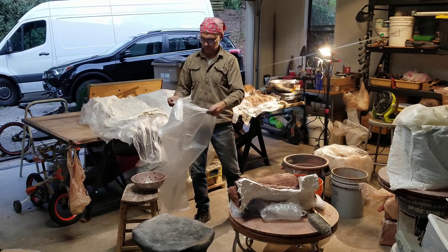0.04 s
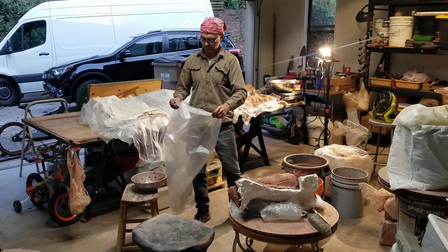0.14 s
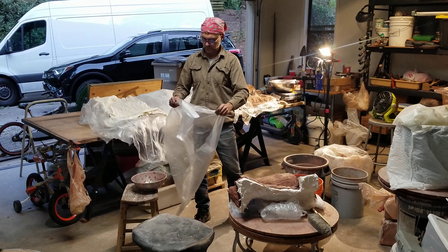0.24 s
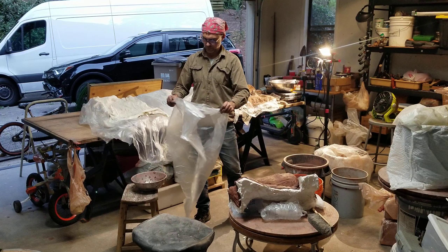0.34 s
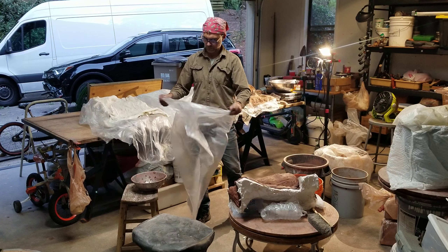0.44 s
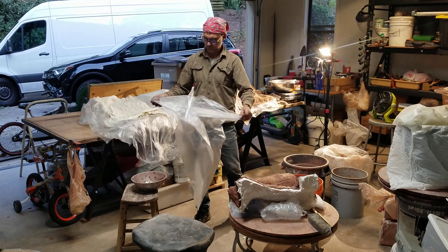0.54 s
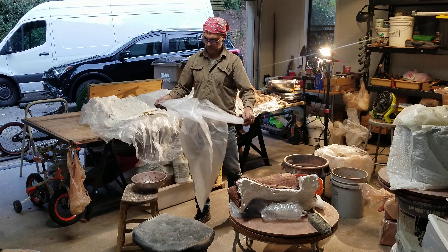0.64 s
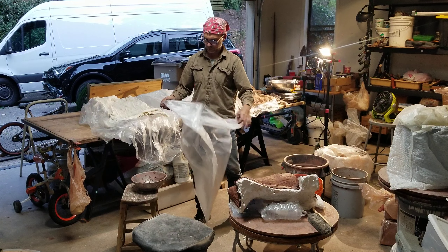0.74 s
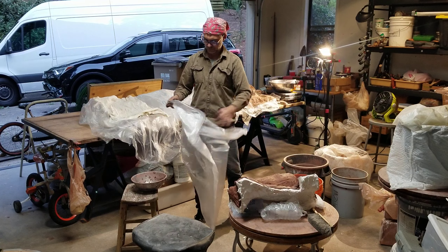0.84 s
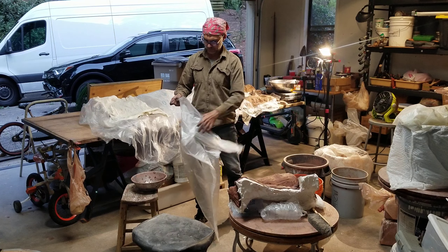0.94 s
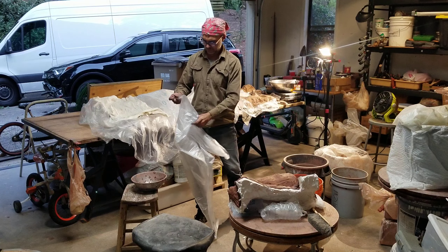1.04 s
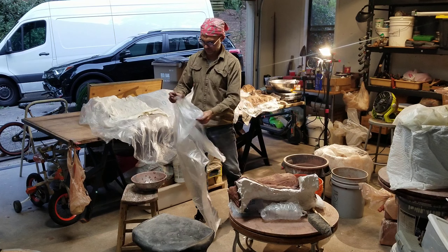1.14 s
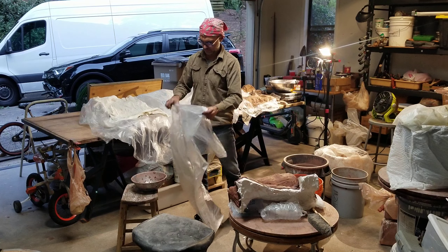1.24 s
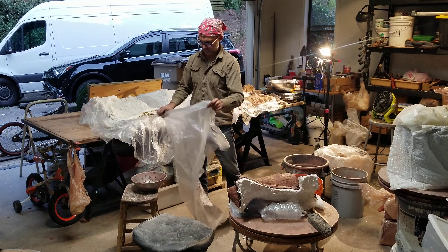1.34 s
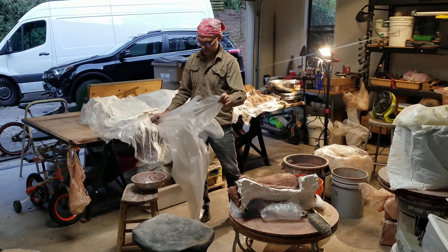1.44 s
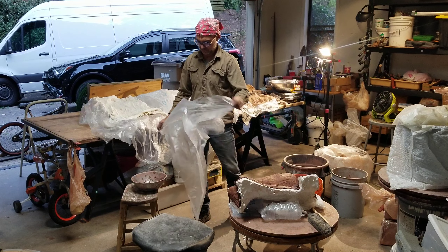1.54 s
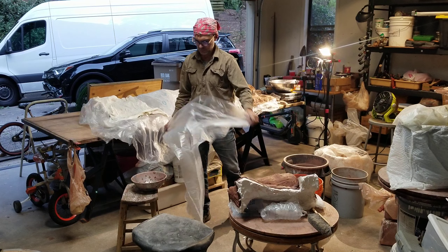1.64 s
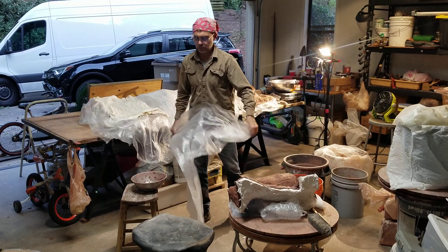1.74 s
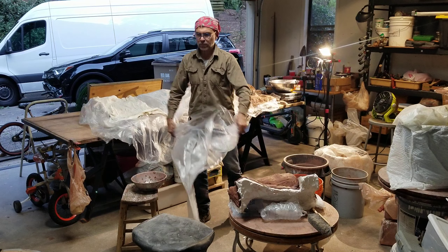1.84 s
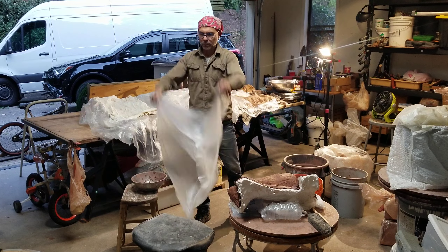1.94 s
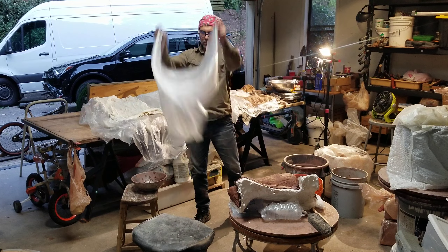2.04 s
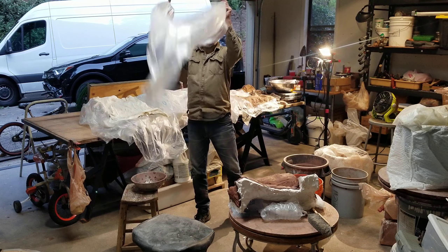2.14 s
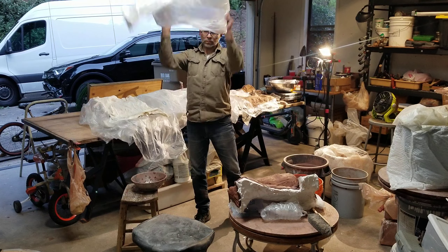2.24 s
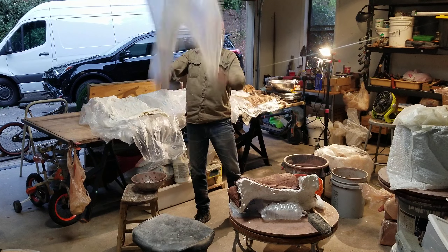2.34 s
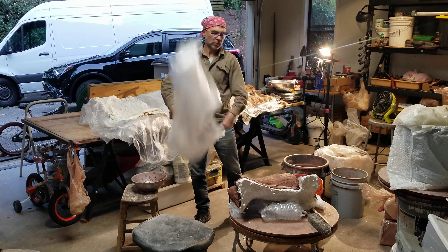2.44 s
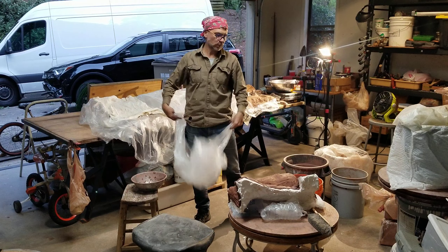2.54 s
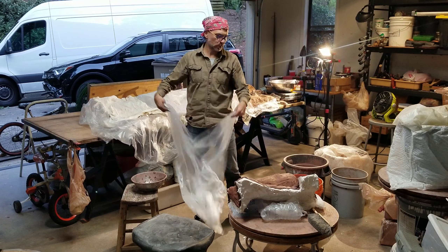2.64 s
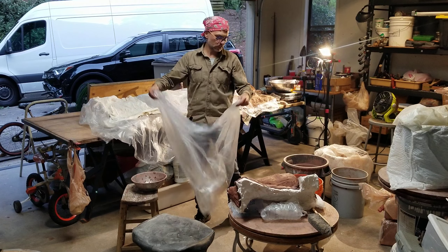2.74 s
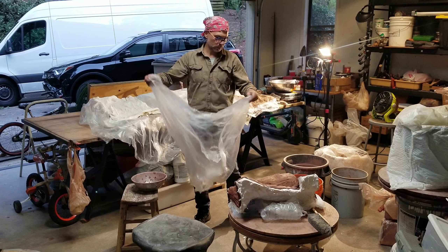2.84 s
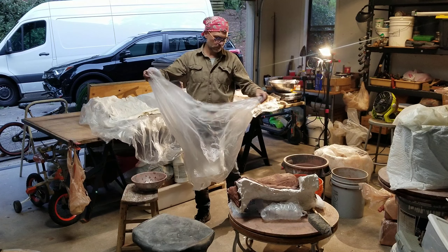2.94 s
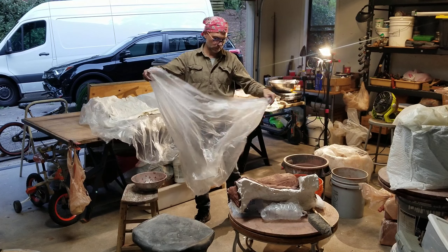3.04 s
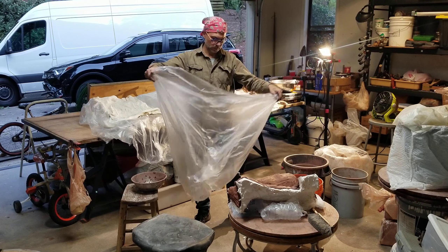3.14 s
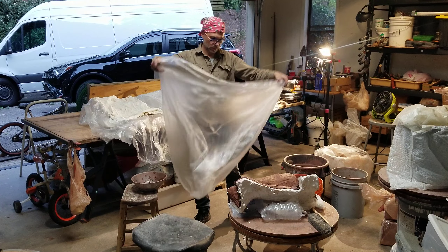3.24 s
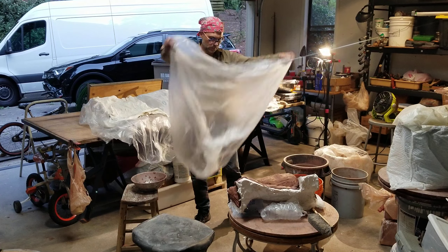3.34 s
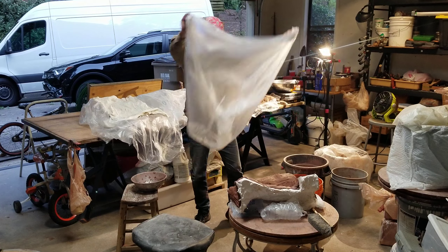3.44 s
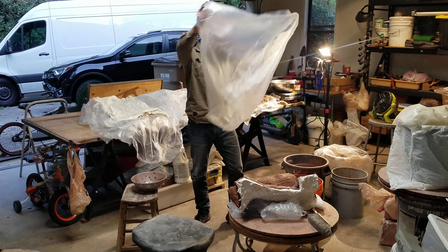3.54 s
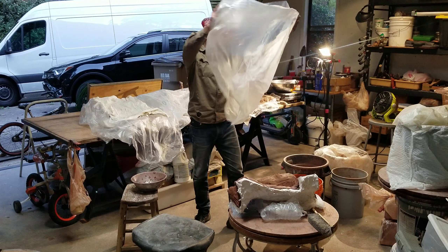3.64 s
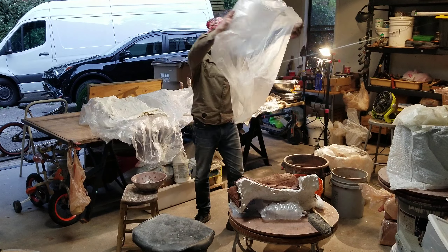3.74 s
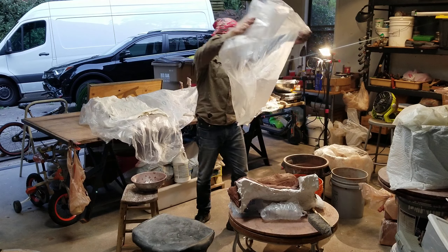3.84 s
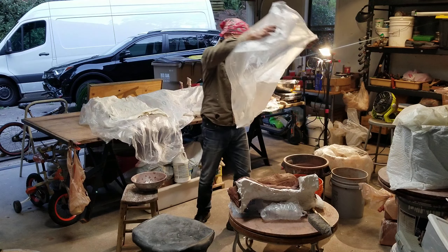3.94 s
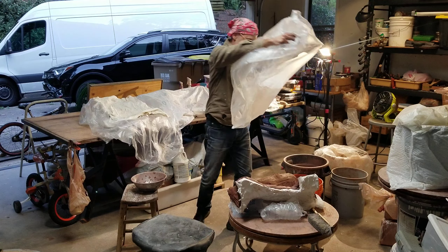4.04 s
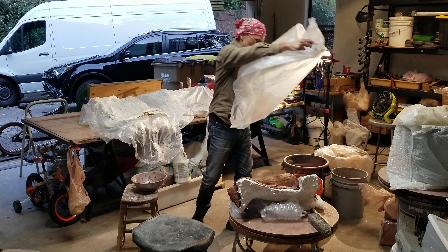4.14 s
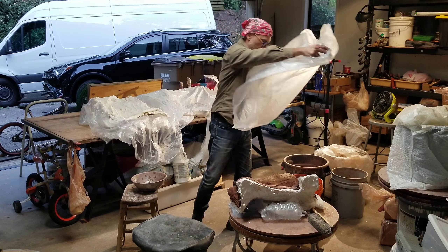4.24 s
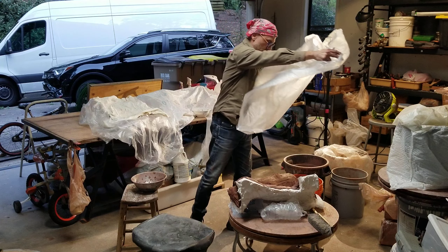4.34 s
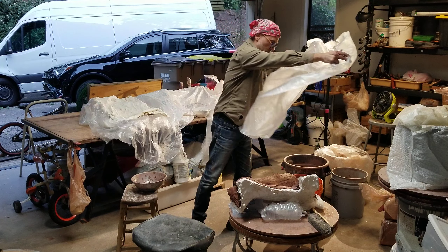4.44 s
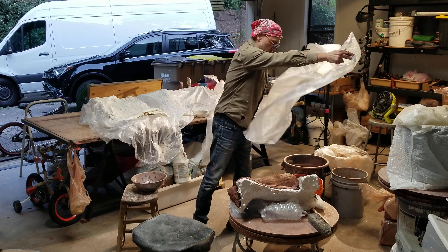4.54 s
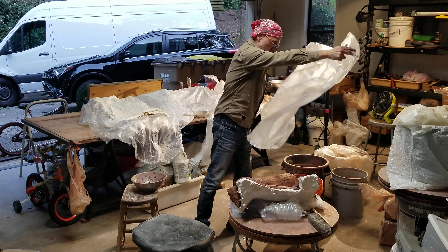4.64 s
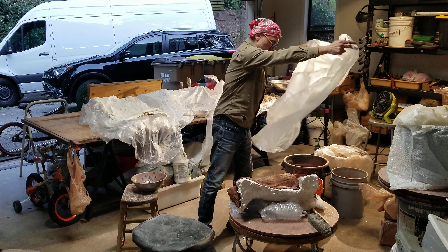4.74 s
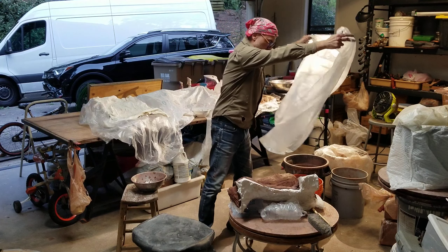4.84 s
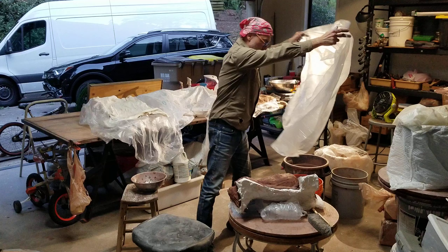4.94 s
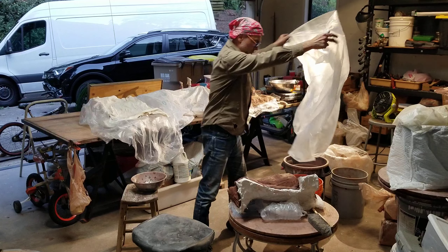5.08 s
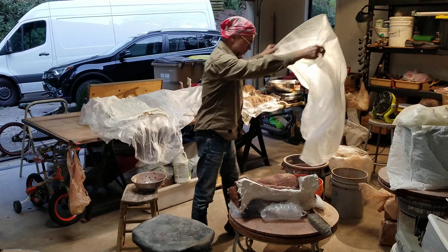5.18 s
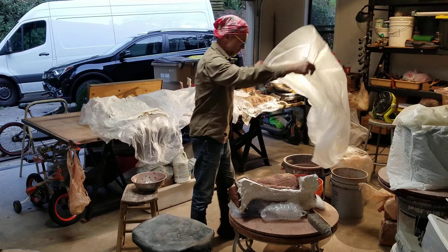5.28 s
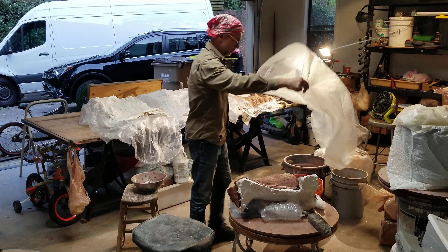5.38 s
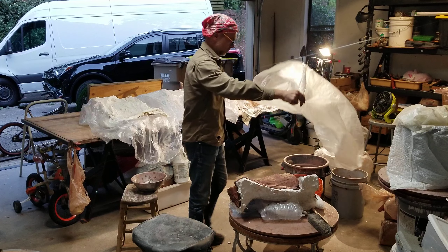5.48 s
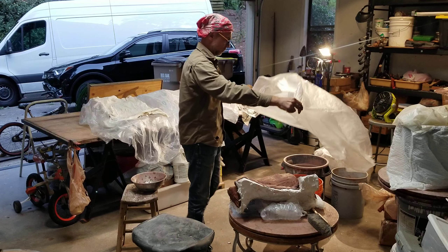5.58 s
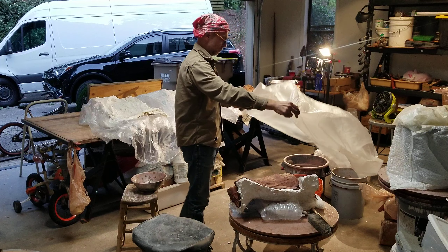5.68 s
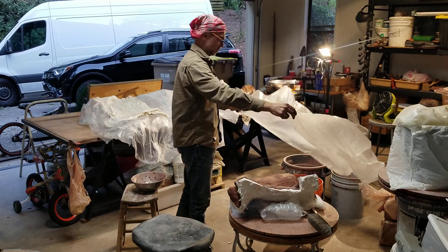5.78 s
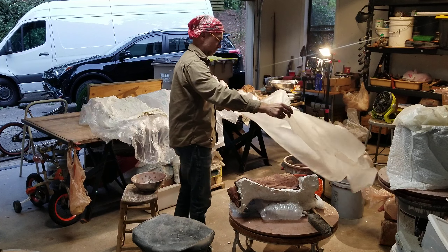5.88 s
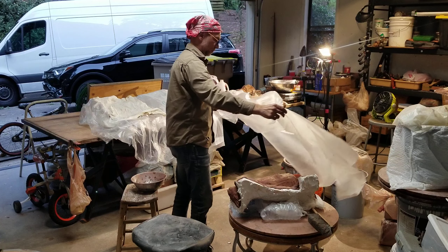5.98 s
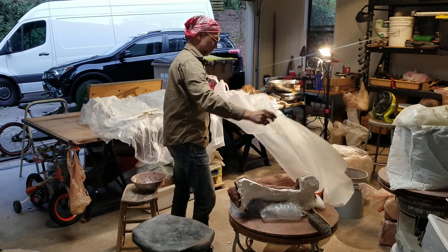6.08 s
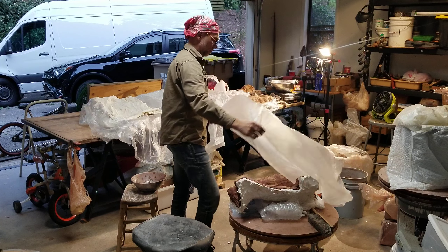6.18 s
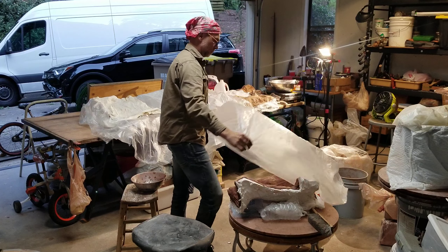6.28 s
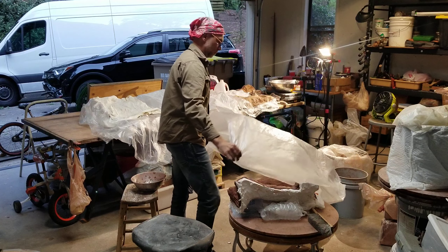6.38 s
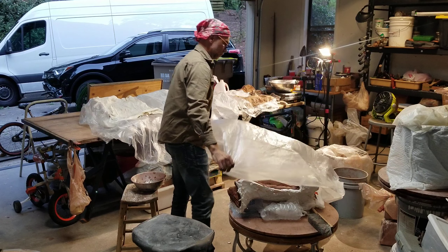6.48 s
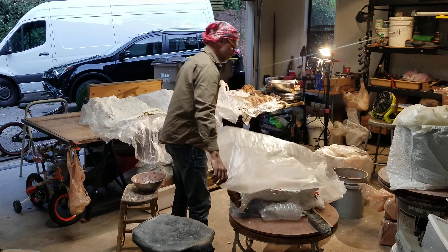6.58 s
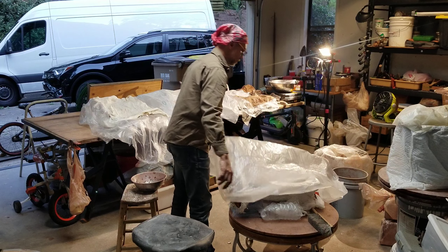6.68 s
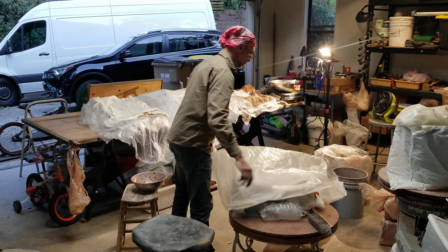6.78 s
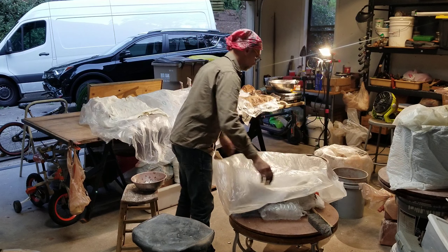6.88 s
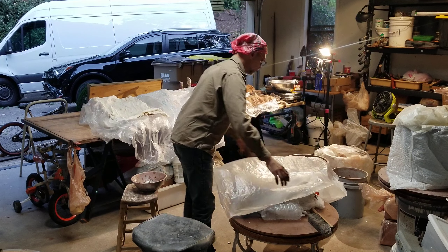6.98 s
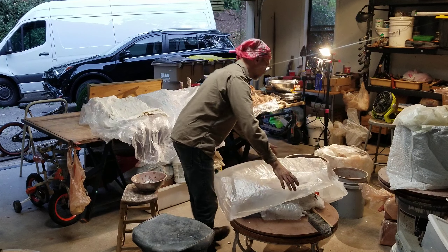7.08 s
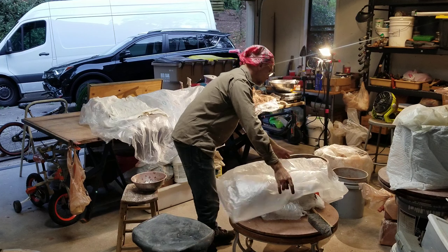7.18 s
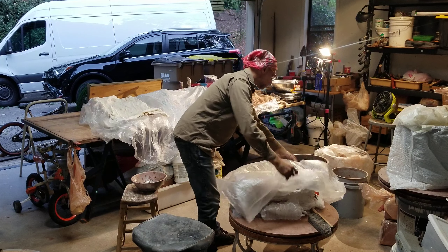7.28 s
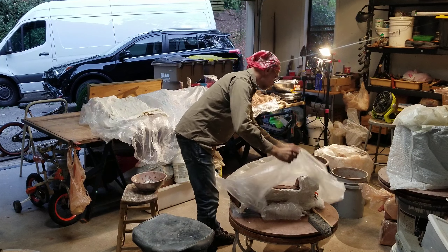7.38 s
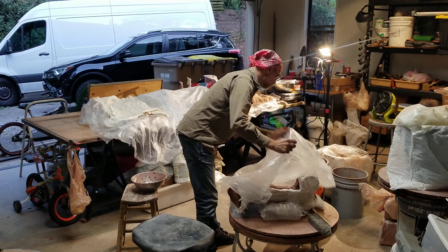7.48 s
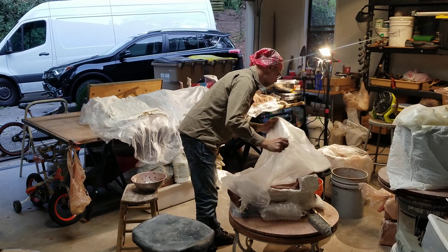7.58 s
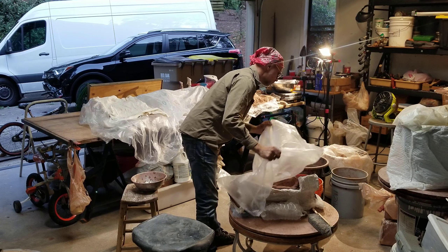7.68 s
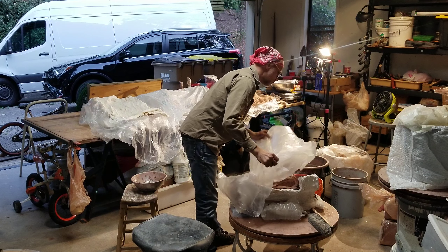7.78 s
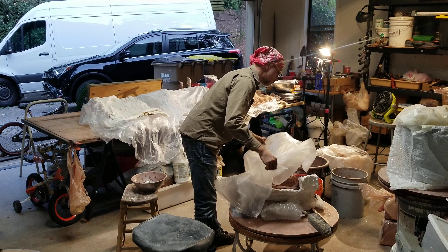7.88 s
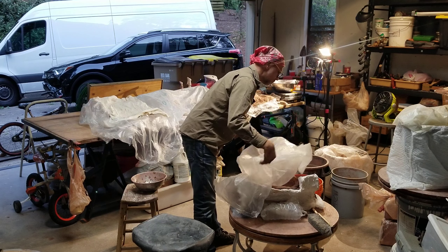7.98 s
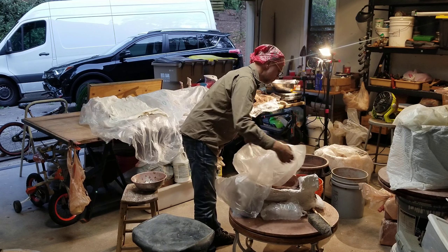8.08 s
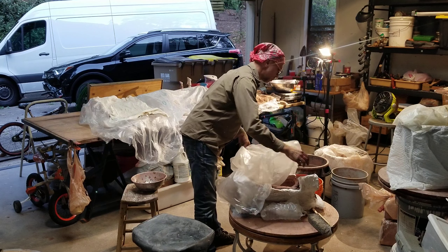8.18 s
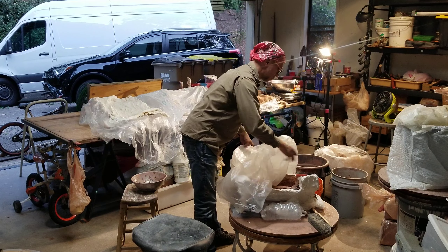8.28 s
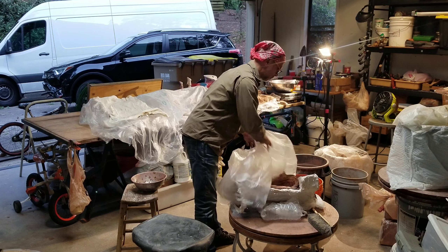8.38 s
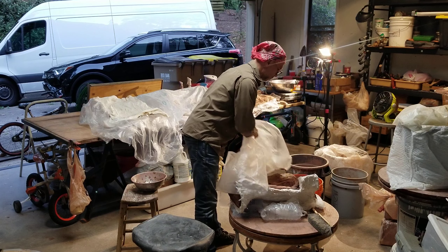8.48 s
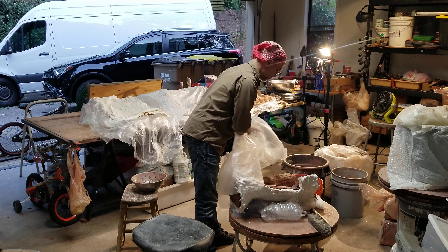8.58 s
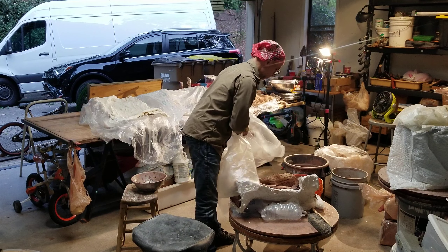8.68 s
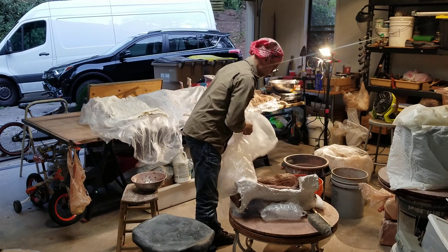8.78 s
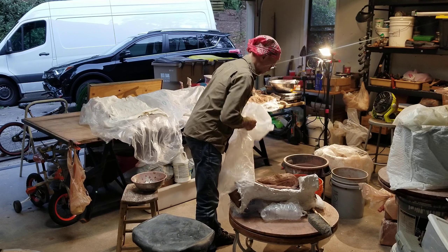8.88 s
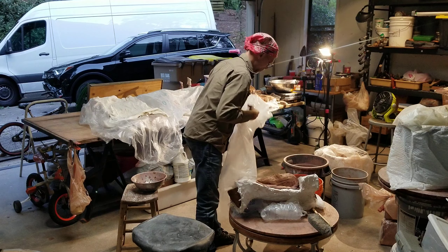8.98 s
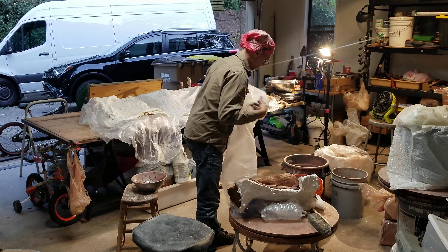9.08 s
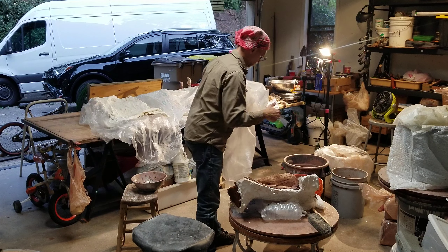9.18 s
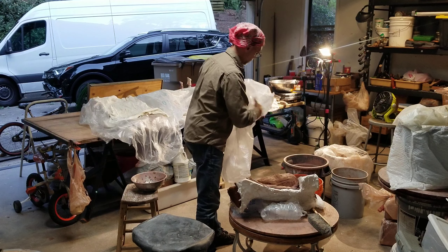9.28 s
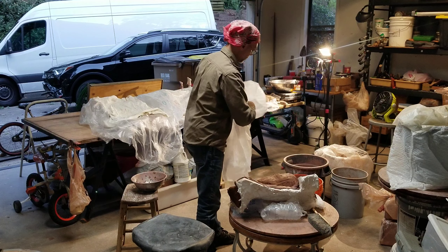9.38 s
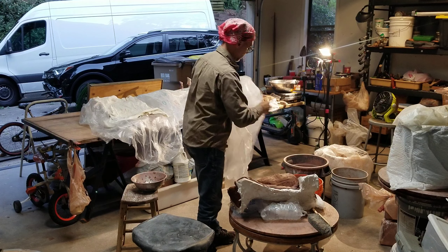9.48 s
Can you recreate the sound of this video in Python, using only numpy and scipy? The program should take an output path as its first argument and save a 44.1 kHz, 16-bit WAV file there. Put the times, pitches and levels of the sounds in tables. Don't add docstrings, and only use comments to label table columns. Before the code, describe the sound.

Bright plastic rustling is already under way at the start, made of thousands of tiny crisp clicks. A strong tug jumps out at about 0.5 s, followed by softer tugs and a broader lifting rustle near 1.4 s. At 1.9 s the sheet is shaken hard, a loud crackling flap with low pushed-air thuds; after a brief dip, a second, sharper shake cracks at about 2.4 s with a taut snap. From 2.6 to 6 s the sound is much quieter: soft swishes and light crinkles as it spreads, nearly hushed around 4.5 s. A gentle swell and faint thump come near 6.3 s as it drapes. From 7.2 s crumpling grows, with bursts near 7.4, 8.4 and 9.3 s, and a final crisp one at 9.5 s. Short garage reverberation and faint low rumble surround it, heard in stereo from a few metres away.

```python
import sys
import numpy as np
from scipy import signal
from scipy.fft import rfft, irfft, next_fast_len
from scipy.io import wavfile
from scipy.ndimage import uniform_filter1d

SR = 44100
rng = np.random.default_rng(int(sys.argv[2]) if len(sys.argv) > 2 else 0)


def gain_from_db(level_db):
    decades = np.asarray(level_db, float) / 20
    return 10 ** decades


def generate_wav(signal):
    frames = np.transpose(np.atleast_2d(signal))
    scaled = np.clip(frames, -1, 1) * 32767
    pcm = np.round(scaled).astype(np.int16)
    wavfile.write(sys.argv[1], SR, pcm)


N = 419812
LONG = next_fast_len(N + SR, True)

# frequency in Hz, level in dB.
CREASE_SPECTRUM = [(150, -41), (280, -32), (450, -14.5), (1000, -6.5), (2000, -0.5), (4000, 0.5), (8000, 2),
                   (16000, 0)]
# frequency in Hz, level in dB.
SHEEN_SPECTRUM = [(3000, -35), (7000, -13.5), (9000, -3.5), (11000, -6), (16000, -11)]
# frequency in Hz, level in dB.
FOLD_SPECTRUM = [(60, -21.5), (130, -14.5), (200, -11.5), (265, -13), (305, -4.5), (415, -1), (560, -2.5),
                 (750, 0.5), (1500, -6.5), (4000, -15), (16000, -43)]
# time in seconds, level in dB, slackness of large folds in dB.
DRAG = [(0.0, -45, 2.5), (0.4, -44.5, 2), (0.62, -51, -1.5), (0.95, -55.5, 0.5), (1.25, -44, -1.5),
        (1.85, -43, 0.5), (2.25, -48.5, 2), (2.95, -54, -1), (3.4, -46.5, -2), (4.02, -49.5, 3),
        (4.27, -56.5, 2.5), (4.58, -56, -2.5), (4.77, -46.5, -0.5), (5.15, -46.5, 0), (5.48, -53.5, 1),
        (6.8, -54.5, 1), (7.5, -46, -0.5), (9.52, -51.5, 3)]
# peak in seconds, peak level in dB, rise in seconds, fall in seconds.
UNFOLD = [
    (0.0, -39, .05, 0.074),
    (0.475, -40, 0.11, .04),
    (0.535, -31.5, 0.072, 0.04),
    (0.713, -43, 0.083, 0.045),
    (0.838, -41, .08, 0.059),
    (1.04, -43.5, 0.13, 0.073),
    (1.2, -41.5, .1, 0.054),
    (1.37, -36.5, 0.19, 0.15),
    (1.63, -48, .1, 0.072),
    (1.746, -48.5, 0.038, 0.089),
]
# peak in seconds, peak level in dB, rise in seconds, fall in seconds.
SHAKE = [
    (1.92, -28, 0.025, 0.056),
    (1.952, -23.5, 0.043, 0.062),
    (2.025, -31, .05, 0.036),
    (2.085, -36.5, 0.036, .08),
    (2.357, -22.5, 0.029, 0.088),
    (2.42, -37, .04, 0.058),
]
# peak in seconds, peak level in dB, rise in seconds, fall in seconds.
SPREAD_AND_DRAPE = [(2.62, -42, 0.088, 0.17), (2.74, -39.5, 0.2, 0.11), (2.83, -45, 0.053, 0.082),
                    (3.1, -47, 0.13, 0.22), (3.3, -44, .1, .05), (3.367, -43, 0.052, 0.12), (3.48, -45.5, 0.1, 0.15),
                    (3.756, -47, 0.15, 0.11), (5.19, -47.5, 0.09, 0.37), (5.59, -47.5, 0.1, .15),
                    (5.787, -48.5, .1, .08), (5.877, -44, .1, 0.15),
                    (6.12, -42.5, 0.1, 0.31), (6.356, -44.5, 0.12, 0.099), (6.505, -46.5, 0.067, 0.13),
         (6.715, -52, 0.14, 0.096), (6.914, -51.5, 0.27, 0.078), (7.024, -54, 0.073, .12),
         (7.195, -41.5, 0.067, 0.21), (7.308, -40.5, 0.11, .12), (7.408, -36, .1, 0.18),
         (7.6, -48, .1, .15), (7.728, -40.5, .12, 0.092), (8.042, -40, 0.077, 0.037),
         (8.11, -45.5, .08, 0.21), (8.35, -41, 0.024, .1), (8.39, -35.5, 0.048, .12),
         (8.52, -44.5, 0.088, .3), (8.745, -43, 0.19, 0.34), (8.985, -45.5, 0.33, 0.084),
         (9.12, -44.5, 0.11, 0.075), (9.318, -38.5, 0.025, .25), (9.44, -44.5, 0.074, .1),
         (9.518, -34, 0.055, .1)]
# start in seconds, peak
# level in dB, pitch in Hz, T60 in seconds.
SNAPS = [(2.358, -10, 2040, 0.014), (2.36, -19.5, 2900, .01), (2.36, -17, 1120, 0.015),
         (2.368, -11, 2130, 0.014), (2.398, -28.5, 70, 0.13), (2.405, -10, 411, 0.047),
         (2.405, -13, 845, 0.04), (2.409, -17.5, 690, 0.03), (2.41, -16, 1110, 0.04),
         (7.175, -45, 1620, .2), (7.21, -43, 1610, .2)]
# start in seconds, peak level in dB, pitch in Hz, T60 in seconds.
THUDS = [(1.925, -38.5, 72, 0.23), (1.94, -37.5, 193, 0.18), (1.99, -44, 131.6, 0.28),
         (2.03, -42, 55.3, 0.26), (2.36, -44, 238, .15), (2.34, -40, 133.5, 0.21), (2.47, -44, 55, .15),
         (2.42, -38, 137, 0.24), (6.31, -63, 59, 0.18), (6.495, -52, 147.5, 0.22), (6.5, -52, 227, .15),
         (6.99, -62, 54, .2), (7.02, -65.5, 147, .15), (7.25, -47, 57.4, .25)]
# frequency in Hz, T60 in seconds.
GARAGE_T60 = [(100, 0.39), (500, 0.26), (2000, 0.24), (6000, 0.23), (16000, 0.14)]
# frequency in Hz, correlation from 0 to 1.
LIKENESS = [(60, 0.95), (150, 0.63), (300, 0.73), (500, 0.64), (900, 0.14), (2000, 0.29), (5000, 0.14),
            (15000, 0)]
# frequency in Hz, level in dB.
RUMBLE_SPECTRUM = [(15, -36), (38, -4.5), (58, 3.5), (85, -13.5), (110, -16), (135, -8.5), (220, -21.5),
                   (500, -37), (16000, -59)]
# peak in seconds, peak level in dB, rise in seconds, fall in seconds.
GUSTS = [(0.6, -67, .1, 0.33), (1.11, -67, .1, .1), (1.96, -52, 0.055, 0.09), (2.07, -50, .1, 0.046),
         (2.41, -48, 0.024, 0.059), (5.81, -63, .15, 0.12), (6.35, -62, .1, .04),
         (6.52, -61.5, 0.063, 0.16), (7.03, -64, .08, .1), (7.31, -61, .1, .07), (7.5, -60, .12, 0.32),
         (8.06, -63, .08, .08), (8.24, -66, .08, .08), (8.43, -66, .1, .3), (9.39, -67, .2, .05)]
# frequency in Hz, gain in dB.
LEFT_PORT = [(60, 2.5), (1000, 3), (2500, 5), (5000, 5), (6300, 1), (7200, -9.5), (8200, -29), (9000, -23),
             (9800, -28), (11000, -7), (13300, 0.5), (14700, -10), (16000, 10)]
# frequency in Hz, gain in dB.
RIGHT_PORT = [(60, 2), (1000, 2), (2200, 2.5), (4000, -0.5), (7000, -0.5), (8300, 1), (9300, -1.5),
              (10300, 1), (12000, 6.5), (13500, 6), (14400, 3.5), (16000, -1)]


def sheet(patches=16):
    gestures = UNFOLD + SHAKE + SPREAD_AND_DRAPE
    tremor_db = 0.4 * wander(hz=12)
    level_db = swells(control(DRAG), gestures) + tremor_db
    effort_db = level_db + 45

    crease = gain_from_db(level_db + 5) * buckles(per_s=9000, spread_db=3.5, clump_db=0.71)
    sheen = crease * (gain_from_db(-0.5 + 0.1044 * effort_db) - 1)
    fold_db = level_db - 2.5 + 0.3349 * effort_db + control(DRAG, column=2)
    fold = gain_from_db(fold_db) * buckles(per_s=2500, spread_db=4.0, clump_db=2.0)
    clicks = np.array([crease, sheen, fold])

    lead_in = clicks[:, 5999::-1]
    clicks = np.hstack([clicks, np.zeros((3, LONG - N - 6000)), lead_in])

    colours = np.array([response(CREASE_SPECTRUM), response(SHEEN_SPECTRUM), response(FOLD_SPECTRUM)])
    patch = rng.integers(0, patches, LONG)
    heard = 0
    for k in range(patches):
        radiated = (rfft(clicks * (patch == k), LONG) * colours).sum(0)
        heard = heard + radiated * paths(wet_db=7.0)
    return irfft(heard, LONG)[:, :N]


def buckles(per_s, spread_db, clump_db):
    size = gain_from_db(spread_db * np.minimum(rng.exponential(1, N), 4))
    chance = rng.uniform(-1, 1, N)
    clicks = np.sign(chance) * (abs(chance) < per_s / SR)
    return evened(clicks * size * gain_from_db(clump_db * wander(hz=30)))


def snaps():
    return garage(knocks(SNAPS, rise_s=0.00068, gain_db=-3.7), wet_db=-9.0)


def thuds():
    return knocks(THUDS, rise_s=0.025, gain_db=2.5)


def knocks(rows, rise_s, gain_db):
    out = np.zeros(N)
    t = np.arange(SR // 2) / SR
    onset = 1 - np.exp(-t / rise_s)
    for s, db, hz, t60 in rows:
        ring = np.sin(2 * np.pi * hz * t) + 0.55 * np.sin(2 * np.pi * 1.6 * hz * t)
        knock = gain_from_db(db + gain_db - 60 * t / t60) * onset * ring
        part = out[round(s * SR):][:len(t)]
        part += knock[:len(part)]
    return out


def garage(x, wet_db):
    return irfft(rfft(x, LONG) * paths(wet_db), LONG)[:, :N]


def paths(wet_db):
    frames, hop = 130, 128
    hz, spectra = diffuse_pair(frames)
    frame_s = np.arange(frames) * hop / SR
    spectra = spectra * gain_from_db(-60 * frame_s / read(GARAGE_T60, hz)[:, None])
    tail = signal.istft(spectra, nperseg=512, noverlap=384)[1]
    tail = tail * gain_from_db(wet_db) / np.linalg.norm(tail[0])
    path = np.pad(tail, ((0, 0), (150, 0)))
    path[[0, 1], rng.integers(0, 18, 2)] += 1
    path[1] = np.roll(path[1], 3)
    return rfft(path, LONG) / np.sqrt(1 + gain_from_db(2 * wet_db))


def diffuse_pair(frames):
    hz = np.fft.rfftfreq(512, 1 / SR)
    a, b, c, d = rng.standard_normal((frames, len(hz), 4)).T
    left, other = a + 1j * b, c + 1j * d
    same = np.clip(read(LIKENESS, hz), 0, 1)[:, None]
    return hz, np.array([left, same * left + np.sqrt(1 - same ** 2) * other])


def rumble():
    common, apart = rng.standard_normal(N), rng.standard_normal((2, N))
    low = evened(colour(common + 0.47 * apart, RUMBLE_SPECTRUM))
    power = (low ** 2).mean(0)
    power = uniform_filter1d(uniform_filter1d(power, size=2500), size=2500)
    steady = evened(low / (abs(power) + 0.05) ** 0.18)
    calm_db, limit_db = -73.5, -56
    air_db = np.minimum(swells(np.full(N, calm_db), GUSTS), limit_db)
    return gain_from_db(air_db - 3.0) * steady


def swells(bed_db, rows):
    t = np.arange(0, N, 64) / SR
    power = gain_from_db(2 * bed_db[::64])
    for s, db, rise, fall in rows:
        drop_db = 10 * np.maximum((s - t) / rise, (t - s) / fall)
        power = power + gain_from_db(2 * (db - drop_db))
    return np.interp(np.arange(N) / SR, t, 10 * np.log10(power))


def control(rows, column=1):
    rows = np.array(rows)
    return np.interp(np.arange(N) / SR, rows[:, 0], rows[:, column])


def wander(hz):
    return evened(signal.lfilter(*signal.butter(2, hz, fs=SR), rng.standard_normal(N)))


def evened(x):
    return x / np.sqrt(np.mean(x ** 2) + 1e-20)


def read(points, hz):
    f, value = np.transpose(points)
    return np.interp(np.log(hz + 1), np.log(f + 1), value)


def response(points):
    hz = abs(np.fft.fftfreq(8192, 1 / SR))
    log_gain = np.log(gain_from_db(read(points, hz)))
    impulse = np.fft.ifft(np.exp(np.conj(signal.hilbert(log_gain)))).real
    return rfft(impulse[:4096], LONG)


def colour(x, points):
    return irfft(rfft(x, LONG) * response(points), LONG)[..., :N]


def scene():
    return sheet() + snaps() + thuds() + rumble()


def roll_off(x):
    return signal.sosfilt(signal.butter(12, 17060, fs=SR, output="sos"), x)


def record(dry):
    ports = np.vstack([colour(dry[0], LEFT_PORT), colour(dry[1], RIGHT_PORT)])
    edge = signal.firwin(3071, 15790, window=("kaiser", 11), fs=SR)
    mix = signal.oaconvolve(ports, edge[None], "same")
    return roll_off(mix)


dry = scene()
out = record(dry)
generate_wav(out)
```